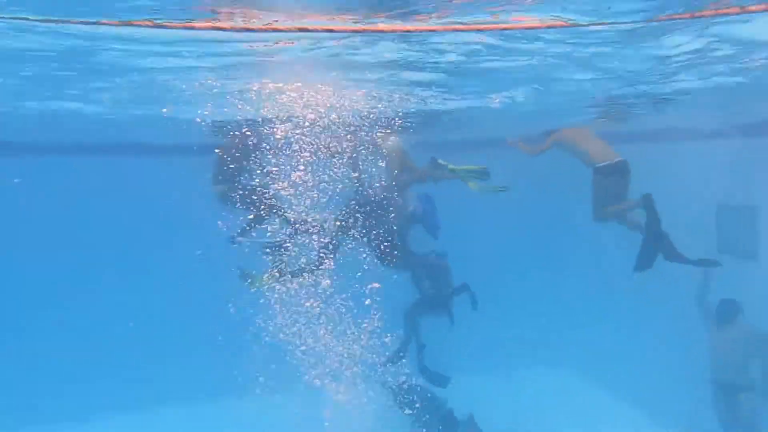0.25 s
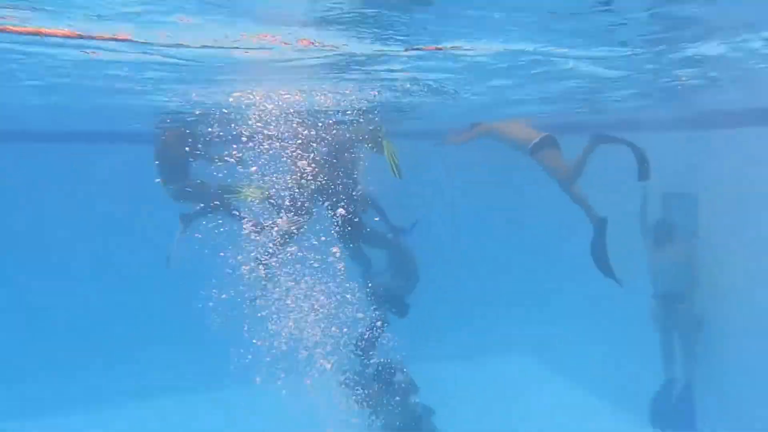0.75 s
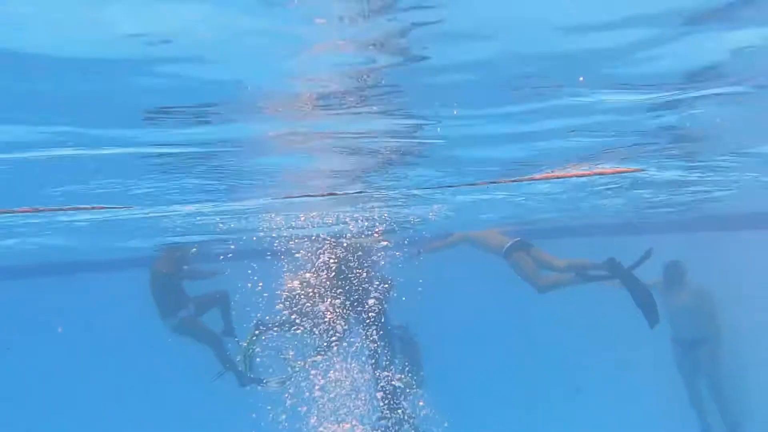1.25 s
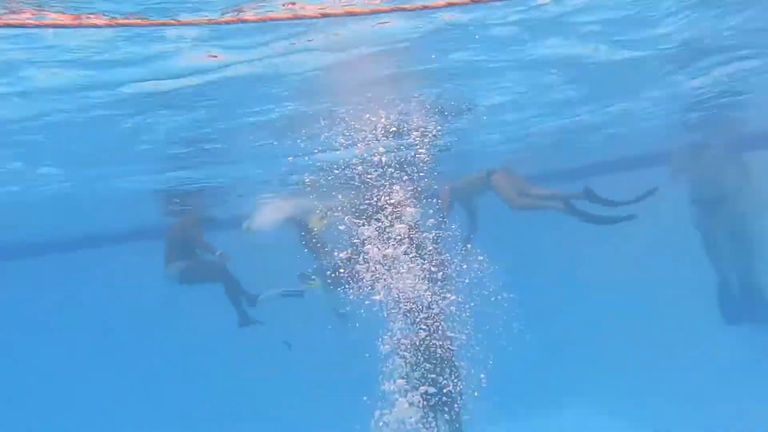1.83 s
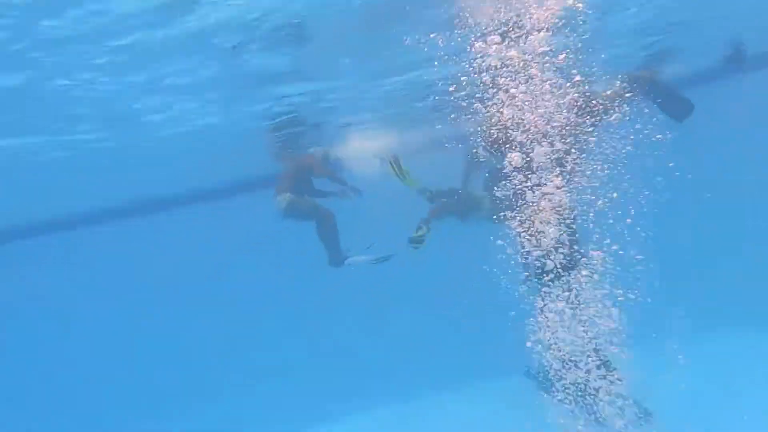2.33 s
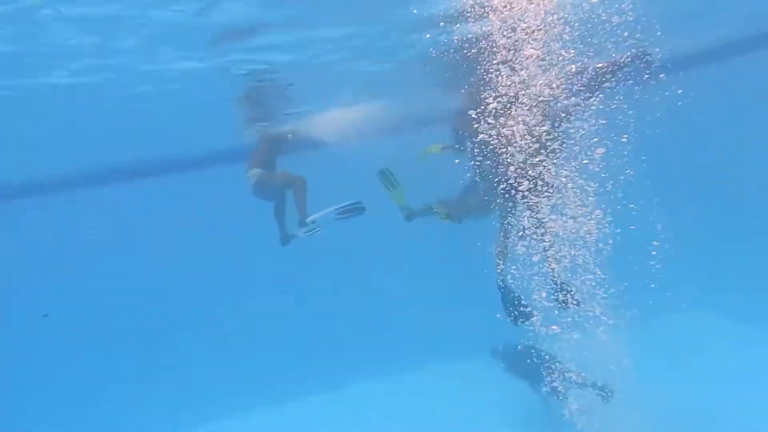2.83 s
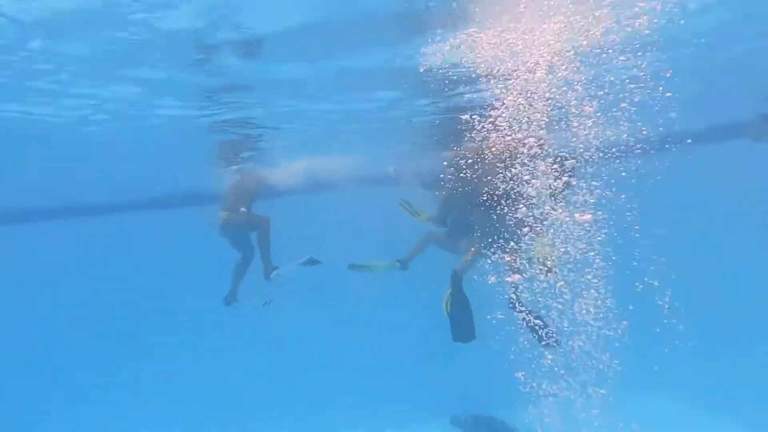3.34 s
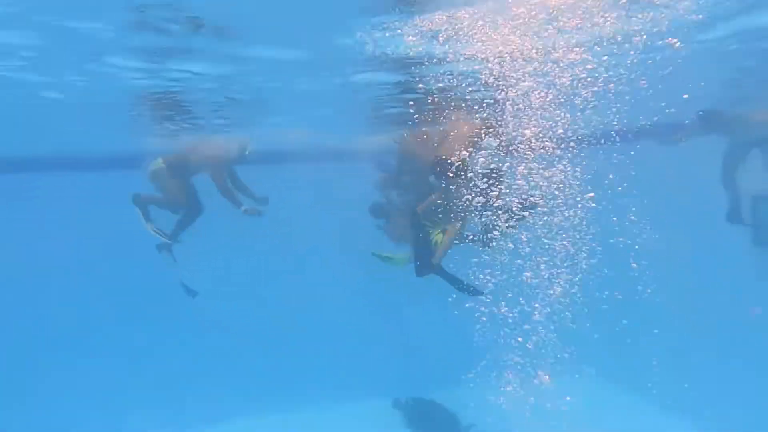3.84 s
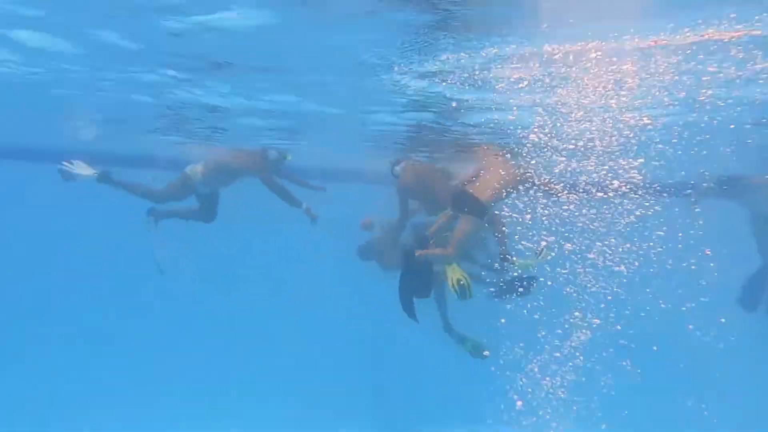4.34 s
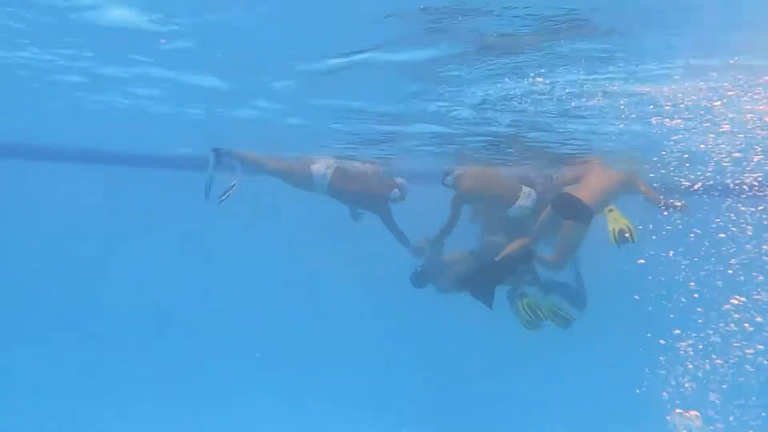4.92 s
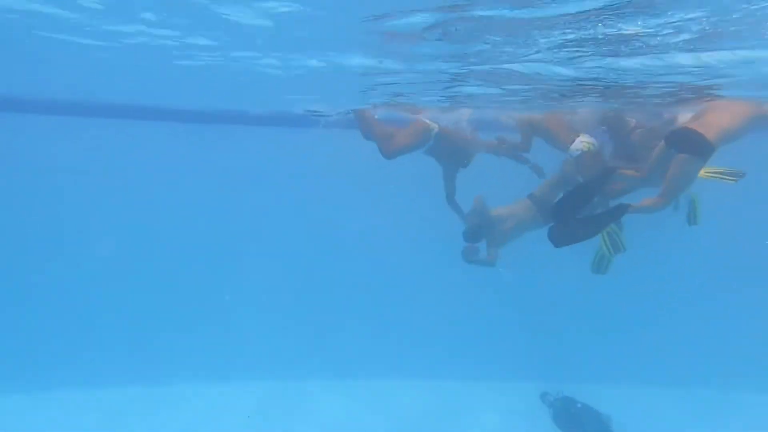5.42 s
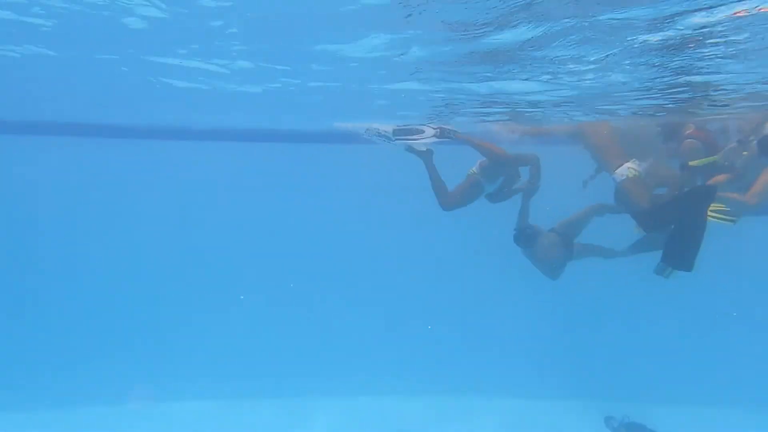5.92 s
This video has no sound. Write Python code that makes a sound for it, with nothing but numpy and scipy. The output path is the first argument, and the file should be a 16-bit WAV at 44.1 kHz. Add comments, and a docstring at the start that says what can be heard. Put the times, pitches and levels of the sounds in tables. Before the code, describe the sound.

A submerged camera in a sealed case picks up muffled pool water: steady hollow humming from churning bubbles, low sloshing and faint fizz. Swimmers' kicks land as dull low thumps in a cluster, with fine crackling, followed by a short calm. Then churning swells, with round ringing gulps, bumps and bubble bursts. Thumps thin out later while the gurgling hum continues, with a faint squeak at the end.

```python
"""Under water in a swimming pool, heard inside a camera housing while finned swimmers grapple.
First a churning column of bubbles makes the housing hum, and gulps of air set it ringing.
From about half a second, kicks and collisions thump, bubbles spray, and a breaking air pocket crackles.
A lull follows at one second, with the deep sway still there; then kicks and churning return.
Louder gulps come and go, more bubbles spray near the end, and a short squeak comes last."""
import sys
import numpy as np
from scipy import signal
from scipy.fft import rfft, irfft, next_fast_len
from scipy.io import wavfile
from scipy.ndimage import uniform_filter1d, map_coordinates

SR = 44100
rng = np.random.default_rng(int(sys.argv[2]) if len(sys.argv) > 2 else 0)


def pcm_store(signal):
    """Save signal as 16-bit PCM."""
    levels = np.round(np.clip(np.atleast_2d(signal), -1, 1) * 32767)
    wavfile.write(sys.argv[1], SR, levels.astype(np.int16).T)


N = 272538  # length of the scene in samples


def amp(db):
    """Turn decibels into a gain."""
    return 10 ** (np.asarray(db) / 20)


def unit(x):
    """Scale a sound to an rms of 1."""
    return x / np.sqrt(np.mean(x ** 2) + 1e-20)


def gain(points, hz):
    """Gain at each frequency, from (Hz, dB) points joined on a log frequency axis."""
    f, db = np.transpose(points)
    return amp(np.interp(np.log(hz + 1), np.log(f + 1), db))


def curves(rows):
    """Join the rows into one value per sample, for each column after the time."""
    s, *cols = np.transpose(rows)
    return [np.interp(np.arange(N) / SR, s, c) for c in cols]


def wobble(rate):
    """A smooth random curve with rate random points a second."""
    points = rng.standard_normal(int(N * rate / SR) + 4)
    return map_coordinates(points, [np.arange(N) * rate / SR])


def filtered(x, response):
    """Shape a sound's spectrum with a response that depends on frequency."""
    m = next_fast_len(N + SR // 2)
    return irfft(rfft(x, m) * response(np.fft.rfftfreq(m, 1 / SR)), m)[:N]


def lowpass(x, hz, order):
    """Weaken what lies above a frequency; a higher order cuts more steeply."""
    return signal.sosfilt(signal.butter(order, hz, fs=SR, output="sos"), x)


def band(x, hz, octaves, order):
    """Keep mostly what lies within some octaves to either side of a pitch."""
    edges = np.clip([hz * 2 ** -octaves, hz * 2 ** octaves], 1, SR / 2 - 1)
    return signal.sosfilt(signal.butter(order, edges, "band", fs=SR, output="sos"), x)


def arch(t, length):
    """A rounded swell that lasts length seconds."""
    return np.sqrt(np.abs(np.sin(np.pi * np.clip(t / length, 0, 1))))


def add(track, s, sound):
    """Mix a sound into the track from time s in seconds."""
    start = int(np.clip(round(s * SR), 0, N - 1))
    track[start:start + len(sound)] += sound[:N - start]


def bubble(t, hz, life, rise, onset):
    """A ringing air pocket: it builds over onset cycles, falls 60 dB in life seconds and rises in pitch."""
    phase = 2 * np.pi * hz * t * (1 + rise * np.minimum(t / life, 2) / 2)
    build = 1 - np.exp(-(t * hz / onset) ** 2)
    shape = build * amp(-60 * t / life)
    return np.sin(phase) * shape / (shape.max(axis=-1, keepdims=True) + 1e-9)


def swarm(low_hz, high_hz, cycles, spread_db, blur, count, size):
    """Count bubbles at random moments, plus noise for countless far ones; blur is far over near rms."""
    when, pitch, strength = rng.random((count, 3)).T[:, :, None]
    hz = low_hz * (high_hz / low_hz) ** pitch
    step = np.arange(size)
    level = amp(-spread_db * np.log(np.maximum(1 - strength, .01))) * hz / low_hz
    grains = level * bubble(step / SR, hz, cycles / hz, rise=0.19, onset=0.68)
    places = (when * N).astype(int) + step
    near = np.bincount(places.ravel(), grains.ravel(), N)[:N]
    return unit(near) + blur * rng.standard_normal(N)


# The notes at which the housing rings.
# Each row: pitch in Hz, width in Hz, level in dB before the muffling.
HOUSING_RESONANCES = [(111.5, 10, -14), (180.8, 9.9, -7.5), (321, 43, -6), (362, 62.7, -7.5),
                      (434, 38.5, -2), (486.9, 43, -5.5), (537, 70.6, -11)]
# How the housing dulls the sound. Each row: frequency in Hz, gain in dB.
HOUSING_MUFFLE = [(30, -25.5), (100, -4.5), (200, 0), (540, -2.5), (620, -6.5), (700, -15), (1000, -18.5),
                  (2000, -65.5)]


def housing(hz):
    """The case rings at a few low resonances and shuts out what lies above them."""
    modes = 0
    for k, (center, width, db) in enumerate(HOUSING_RESONANCES):
        ring = 1j * hz * width / (center * center - hz * hz + 1j * hz * width)
        modes = modes + amp(db) * ring * (-1) ** k  # every other one is flipped
    return modes * gain(HOUSING_MUFFLE, hz)


def churn(level_db, rate=900, flutter_db=0.92):
    """Air pockets break up in the column: irregular pressure kicks keep the housing humming."""
    moments = rng.random(N) < rate / SR  # about rate kicks a second
    kicks = moments * rng.standard_normal(N) * amp(flutter_db * wobble(25))
    return amp(level_db) * unit(filtered(kicks, housing))


HUM_HZ, HUM_WIDTH_HZ = 442.4, 34.7  # the main resonance
HUM_DB, HUM_PER_CHURN = -33.5, 0.46  # level at average churn; dB gained per dB of churn


def hum(surge_db):
    """The stir of the whole pool keeps the main resonance singing even when the column is calm."""
    ring = filtered(rng.standard_normal(N), lambda hz: 1 / (1 + ((hz - HUM_HZ) / HUM_WIDTH_HZ) ** 2) ** 2)
    return amp(HUM_DB + HUM_PER_CHURN * surge_db) * unit(ring)


GULP_S = 0.031  # sets the length of the swell
# Gulps of air that set the housing ringing.
# Each row: middle of the swell in seconds, level in dB (the peak lies 5 dB lower).
AIR_GULPS = [(0.109, -12.5), (0.351, -12.5), (0.468, -12.5), (0.545, -11), (0.695, -11.5), (1.692, -21),
             (1.892, -11), (1.992, -19.5), (2.108, -16), (2.403, -8.5), (2.493, -11), (2.582, -14.5),
             (2.83, -13), (2.915, -7.5), (2.975, -11), (3.24, -15.5), (3.304, -9.5), (3.517, -9.5),
             (3.97, -13.5), (4.032, -15), (4.31, -12), (4.376, -3.5), (4.454, -8.5), (4.733, -4.5),
             (5.464, -12.5), (5.670, -10.5)]


def gulps(ring_hz=440, scatter=0.0212, waver=0.5):
    """Big bubbles swell and fade near the housing's main resonance, wavering as they change shape."""
    out, t = np.zeros(N), np.arange(SR // 5) / SR
    middle = t[-1] / 2
    swell = np.exp(-(2 * (t - middle) / GULP_S) ** 2)
    shape_change = wobble(130)
    variations = rng.standard_normal((len(AIR_GULPS), 2))
    for (s, db), (detune, start_cycles) in zip(AIR_GULPS, variations):
        drift = waver * np.roll(shape_change, -round(s * SR))[:len(t)]
        cycles = ring_hz * (1 + scatter * detune) * t + start_cycles
        add(out, s - middle, amp(db - 5.0) * swell * np.sin(2 * np.pi * cycles + drift))
    return out


THUMP_T60_S = 0.071  # time to fall by 60 dB
# Kicks and big air pockets.
# Each row: start in seconds, peak in dB before the case dulls it, pitch in Hz at the start.
KICKS_AND_POCKETS = [(0.4385, -16.5, 338), (0.523, -9, 74), (0.530, -11, 193.5), (0.543, -15.5, 328),
                     (0.558, -10, 62), (0.553, -15, 136), (0.585, -8.5, 169), (0.615, -11, 133.6),
                     (0.642, -17, 191), (0.926, -25.5, 63.5), (1.347, -25.5, 83), (1.437, -21.5, 241),
                     (1.504, -17.5, 221), (1.509, -22, 88.6), (1.668, -18.5, 205), (1.700, -19, 230),
                     (1.741, -23, 250), (1.774, -8.5, 93), (1.825, -15.5, 107), (1.827, -14, 223),
                     (1.984, -13.5, 202), (1.997, -9.5, 120), (2.079, -14.5, 101), (2.09, -21, 220),
                     (2.369, -12, 306), (2.482, -11.5, 234), (3.067, -15, 93), (3.124, -20, 76),
                     (3.543, -23.5, 56), (5.493, -18, 181), (6.109, -24, 110)]


def thumps(dull_hz=520):
    """Each kick or big pocket heaves the water for a few cycles; the case dulls the edge of the blow."""
    out, t = np.zeros(N), np.arange(SR // 3) / SR
    for s, db, hz in KICKS_AND_POCKETS:
        add(out, s, amp(db) * bubble(t, hz, THUMP_T60_S, rise=0.14, onset=0.62))
    return lowpass(out, dull_hz, order=4)


WAKE_DB, WAKE_PER_KICK = -31, 0.28  # eddy strength at a 0 dB kick; dB gained per dB of the kick
WAKE_BUILD_S, WAKE_FADE_S = 0.012, 0.075


def wakes():
    """Power of the eddies that build before each kick or pocket and die away after it."""
    t, power = np.arange(N) / SR, np.zeros(N)
    for s, db, _ in KICKS_AND_POCKETS:
        distance = np.maximum((s - t) / WAKE_BUILD_S, (t - s) / WAKE_FADE_S)
        power += amp(WAKE_DB + WAKE_PER_KICK * db) ** 2 * np.exp(-2 * distance)
    return power


def burble(eddy_power, over_eddies_db=1):
    """Large air pockets tumble and burble in the eddies of the kicks."""
    pockets = swarm(62, 280, cycles=13, spread_db=2.5, blur=0.02, count=500, size=7000)
    muffled = lowpass(pockets, 420, order=6)
    return amp(over_eddies_db) * np.sqrt(eddy_power) * unit(muffled)


# Dull knocks, perhaps fins and bodies colliding.
# Each row: middle of the knock in seconds, peak in dB, pitch in Hz.
BODY_KNOCKS = [(0.4434, -16, 240), (0.5371, -9.5, 300), (1.358, -23.5, 282), (1.662, -12.5, 280),
               (2.489, -12.5, 220), (3.062, -7.5, 197), (3.581, -8.5, 330), (3.655, -14.5, 375)]


def knocks():
    """A collision reaches the case as one rounded pressure pulse with a dip to either side."""
    out, t = np.zeros(N), np.arange(SR // 25) / SR
    middle = t[-1] / 2
    for s, db, hz in BODY_KNOCKS:
        u = (np.pi * hz * (t - middle)) ** 2
        add(out, s - middle, amp(db) * (1 - 2 * u) * np.exp(-u))
    return out


POP_T60_S, POP_T60_SLOPE = 0.038, -0.68  # ring time at 1 kHz, and its power law with pitch
# Single bubbles bursting near the case.
# Each row: start in seconds, peak of the ring in dB, pitch in Hz at the start.
NEAR_POPS = [(0.529, -11, 514), (0.6146, -29, 4110), (0.621, -37, 5060), (0.631, -36, 2390),
             (0.6426, -33, 4070), (0.6624, -29, 4180), (0.8047, -37.5, 2150), (0.83, -35, 5100),
             (0.8536, -36, 4170), (0.866, -43, 1390), (0.890, -38, 664), (0.894, -42, 5500),
             (0.9604, -40, 5160), (0.962, -40, 770), (1.055, -38, 655), (1.7862, -26.5, 3680),
             (1.945, -35.5, 3000), (2.486, -31.5, 1105), (2.512, -31.5, 740), (3.577, -19.5, 590),
             (3.650, -26.5, 610), (3.728, -30, 695), (3.790, -33, 653), (4.087, -35, 1430),
             (4.36, -19, 548), (4.874, -38, 3370), (4.9624, -24, 3070)]


def pops(crack=0.3, crack_octaves=0.36):
    """Near bubbles ring briefly, small ones shorter; the tiniest tick most sharply as they pinch off."""
    out, t = np.zeros(N), np.arange(SR // 5) / SR
    for s, db, hz in NEAR_POPS:
        t60 = POP_T60_S * (hz / 1000) ** POP_T60_SLOPE
        noise = unit(band(rng.standard_normal(len(t)), hz, crack_octaves, order=3))
        tick = amp(-60 * t / t60) * min(hz / 3000, 1) ** 2 * noise
        add(out, s, amp(db) * (bubble(t, hz, t60, rise=0.052, onset=1.3) + crack * tick))
    return out


SPRAY_OCTAVES, SPRAY_OCTAVES_SLOPE = 0.39, 0.61  # spread of pitch at 1 kHz, and its power law with pitch
# Bursts of bubbles torn off by the swimmers.
# Each row: start in seconds, rms in dB before build and fade, middle pitch in Hz, time to fade 60 dB in seconds.
BUBBLE_SPRAYS = [(0.512, -35.5, 890, 0.096), (0.91, -45, 1380, 0.33), (1.67, -42, 1104, 0.46),
                 (1.775, -39, 1310, 0.12), (1.86, -40.5, 1310, 0.22), (2.334, -37, 1190, 0.19),
                 (3.98, -43.5, 2920, 0.17), (4.05, -34, 1195, 0.25), (5.08, -41.5, 980, 0.62),
                 (5.165, -37.5, 3120, 0.18), (5.91, -41, 1230, 0.41)]


def sprays():
    """A fin stroke tears off a brief rush of bubbles around one size; long rushes build more slowly."""
    out, t = np.zeros(N), np.arange(SR // 2) / SR
    froth = swarm(700, 7400, cycles=30, spread_db=2.3, blur=1.5, count=3500, size=1300)
    hz = np.fft.rfftfreq(len(t), 1 / SR) + 1
    for s, db, middle_hz, t60 in BUBBLE_SPRAYS:
        octaves = SPRAY_OCTAVES * (middle_hz / 1000) ** SPRAY_OCTAVES_SLOPE
        piece = np.roll(froth, -round(s * SR))[:len(t)]
        around_middle = np.exp(-(np.log2(hz / middle_hz) / octaves) ** 2 / 2)
        rush = irfft(rfft(piece) * around_middle, len(t))
        build = 1 - np.exp(-20 * t / t60)
        add(out, s, amp(db - 60 * t / t60) * build * unit(rush))
    return out


# Tone colour of the pea-sized bubbles. Each row: frequency in Hz, gain in dB.
GURGLE_COLOUR = [(450, -25), (660, -8), (800, -9.5), (900, -1), (1000, 0), (1045, -9.5), (1110, 0),
                 (1300, 3), (1580, -10.5), (1750, -2.5), (2000, -18), (2400, -33), (3500, -44)]
# Tone colour of the tiny bubbles, in the fizz and in the crackle. Each row: frequency in Hz, gain in dB.
FIZZ_COLOUR = [(1200, -10), (2100, -4.5), (2380, -9.5), (2750, -9.5), (3020, 0), (3500, -9), (4000, -5),
               (4400, -5.5), (4700, -13.5), (5000, -7.5), (6000, -13.5), (7200, -21), (8800, -29.5),
               (10000, -52.5)]


def cloud(gurgle_db, fizz_db):
    """Pea-sized bubbles gurgle in clumps and tiny ones fizz, faint through the wall of the case."""
    peas = swarm(650, 2300, cycles=49, spread_db=0.4, blur=1.3, count=1600, size=2000)
    tiny = swarm(2200, 8000, cycles=94, spread_db=2, blur=2.96, count=1800, size=1200)
    gurgle = unit(filtered(peas, lambda hz: gain(GURGLE_COLOUR, hz)))
    fizz = unit(filtered(tiny, lambda hz: gain(FIZZ_COLOUR, hz)))
    return amp(gurgle_db + 0.55 * wobble(15)) * gurgle + amp(fizz_db + 1.2 * wobble(18)) * fizz


CRACKLE_START_S, CRACKLE_END_S, CRACKLE_DB = 0.49, 1, -62.5


def crackle():
    """Tiny bubbles tick at random while the biggest air pocket breaks up."""
    t = np.arange(N) / SR
    ticks = swarm(2530, 8000, cycles=20, spread_db=3.0, blur=0.05, count=900, size=1500)
    active = (t > CRACKLE_START_S) & (t < CRACKLE_END_S)
    breaking = uniform_filter1d(1.0 * active, size=1000)  # soft edges
    return amp(CRACKLE_DB) * breaking * unit(filtered(ticks, lambda hz: gain(FIZZ_COLOUR, hz)))


CLICK_T60_S, CLICK_OCTAVES = 0.025, 0.4  # time to fall by 60 dB; spread of pitch to either side
# Dry clicks with no ring, perhaps gear touching.
# Each row: start in seconds, rms in dB before attack and fade, middle pitch in Hz.
DRY_CLICKS = [(0.667, -50, 6760), (0.889, -37, 2290), (0.928, -38.5, 3220), (0.973, -53, 8000),
              (3.047, -37, 3800), (4.874, -48, 4200), (4.962, -38.5, 4330)]


def clicks(attack_s=0.0014):
    """Short dry snaps, each a broad band of noise."""
    out, t = np.zeros(N), np.arange(SR // 10) / SR
    shape = amp(-60 * t / CLICK_T60_S) * (1 - np.exp(-t / attack_s))
    for s, db, hz in DRY_CLICKS:
        noise = unit(band(rng.standard_normal(len(t)), hz, CLICK_OCTAVES, order=4))
        add(out, s, amp(db) * shape * noise)
    return out


SLIP_S, SLIP_RISE_HZ_PER_S = 0.0137, 6000
SQUEAK_OVERTONE_DB = -7  # the octave above, against the main tone
# Slips of one short squeak, perhaps a rubber fin.
# Each row: start in seconds, peak of the main tone in dB, starting pitch in Hz before it wavers.
SQUEAK_SLIPS = [(6.07, -49, 2090), (6.089, -42.5, 2120), (6.114, -46, 2160)]


def squeak(waver=0.025):
    """Rubber sticks and slips a few times; each slip rises in pitch."""
    out, t = np.zeros(N), np.arange(SR // 25) / SR
    unsteady = 1 + waver * wobble(400)
    for s, db, hz in SQUEAK_SLIPS:
        pitch = (hz + SLIP_RISE_HZ_PER_S * t) * np.roll(unsteady, -round(s * SR))[:len(t)]
        phase = 2 * np.pi * np.cumsum(pitch) / SR
        tone = np.sin(phase) + amp(SQUEAK_OVERTONE_DB) * np.sin(2 * phase)
        add(out, s, amp(db) * arch(t, SLIP_S) * tone)
    return out


CHIRP_S, CHIRP_LENGTH_S = 0.914, 0.03
CHIRP_HZ, CHIRP_OCTAVES, CHIRP_DB = 830, 0.63, -49  # starting pitch, upward slide, level before the flutter


def chirp(flutter_db=9.5):
    """A bubble's note slides upward, faltering."""
    t = np.arange(N) / SR - CHIRP_S
    hz = CHIRP_HZ * 2 ** (CHIRP_OCTAVES * np.clip(t / CHIRP_LENGTH_S, 0, 1))
    note = np.sin(2 * np.pi * np.cumsum(hz) / SR)
    return amp(CHIRP_DB + flutter_db * wobble(150)) * arch(t, CHIRP_LENGTH_S) * note


# Tone colour of water pushing on the case. Each row: frequency in Hz, gain in dB.
SLOSH_COLOUR = [(10, -8.5), (25, 0.5), (38, 1.5), (55, -11.5), (80, -3), (130, -8), (260, -10), (450, -14),
                (800, -67), (3000, -120)]


def slosh(flow_db, lumps_db=2):
    """Eddies push on the case in slow lumps, 5.5 dB above the strength of the flow."""
    flow = filtered(rng.standard_normal(N), lambda hz: gain(SLOSH_COLOUR, hz))
    return amp(flow_db + 5.5) * unit(flow * amp(lumps_db * wobble(11)))


SWAY_DB, SWAY_HZ = -38, 33.8  # level, and upper edge of the deep sway


def sway():
    """The whole body of water rocks slowly against the case, even in the lull."""
    return amp(SWAY_DB) * unit(lowpass(rng.standard_normal(N), SWAY_HZ, order=2))


CHURN_DB, FIZZ_DB = 0.5, 1.24  # churn and fizz over the levels in the two tables below
# Gurgle: average level; dB gained per dB of churn and per dB of fine bubbles.
GURGLE_DB, GURGLE_PER_CHURN, GURGLE_PER_SPARKLE = -50.5, 0.78, 0.76
# Strength of the steady current at average churn; dB gained per dB of churn.
CURRENT_DB, CURRENT_PER_CHURN = -44, 1.76
# How hard the bubble column churns. Each row: time in seconds, level in dB before CHURN_DB is added.
COLUMN_LEVEL = [(0.0, -30.5), (0.62, -29), (1.01, -38), (1.36, -38), (1.62, -31.5), (1.70, -26.5),
                (2.4, -24.5), (3.54, -24), (4.89, -27.5), (5.96, -28.5), (6.18, -25.5)]
# Fine bubbles near the case. Each row: time in seconds, level in dB before FIZZ_DB is added.
SPARKLE_LEVEL = [(0.0, -52.5), (0.43, -52), (0.98, -60.5), (1.27, -57), (1.78, -46.5), (1.89, -53),
                 (2.87, -54.5), (6.18, -55.5)]


def scene():
    """The column drives churn, hum, gurgle and current; kicks stir eddies; near bubbles sound on top."""
    (column_db,), (sparkle_db,) = curves(COLUMN_LEVEL), curves(SPARKLE_LEVEL)
    surge_db = column_db - column_db.mean()
    near_db = sparkle_db - sparkle_db.mean()
    gurgle_db = GURGLE_DB + GURGLE_PER_CHURN * surge_db + GURGLE_PER_SPARKLE * near_db
    eddy_power = wakes()
    current_power = amp(CURRENT_DB + CURRENT_PER_CHURN * surge_db) ** 2
    flow_db = 10 * np.log10(current_power + eddy_power)
    column = churn(column_db + CHURN_DB) + hum(surge_db) + gulps()
    blows = thumps() + burble(eddy_power) + knocks()
    bubbles = pops() + sprays() + cloud(gurgle_db, sparkle_db + FIZZ_DB) + crackle() + chirp()
    gear = clicks() + squeak()
    water = slosh(flow_db) + sway()
    return (column + blows + bubbles + gear + water)[None]


def record(dry):
    """The camera cuts steeply above its band limit of 9300 Hz."""
    return lowpass(dry, 9300, order=20)


dry = scene()
out = record(dry)
pcm_store(out)
```